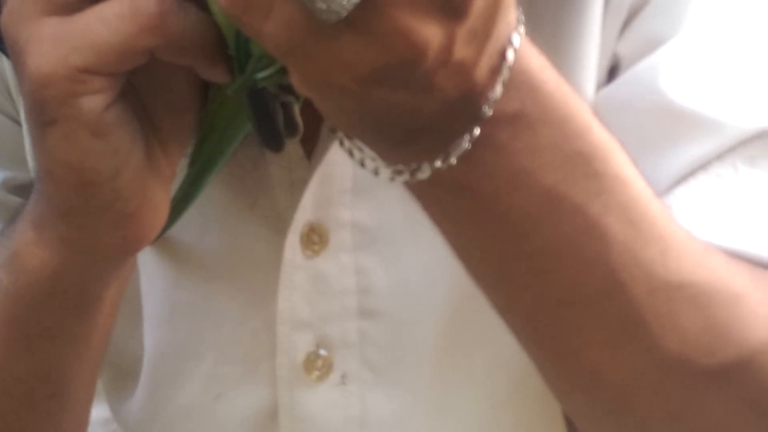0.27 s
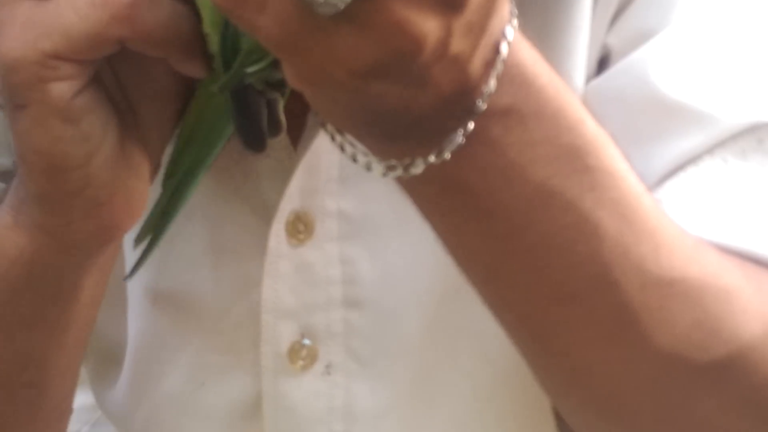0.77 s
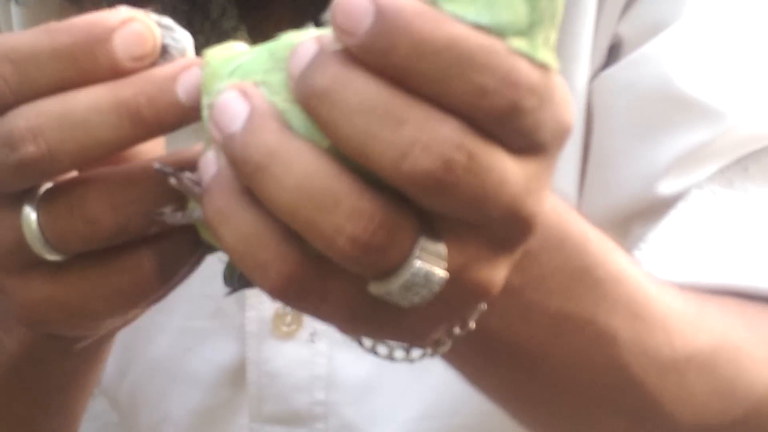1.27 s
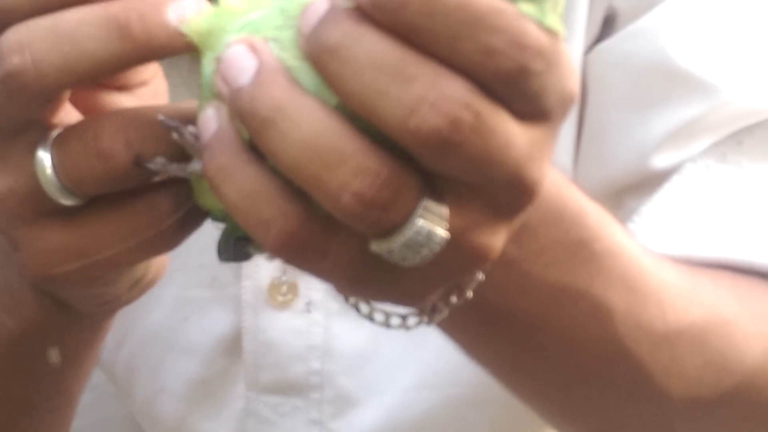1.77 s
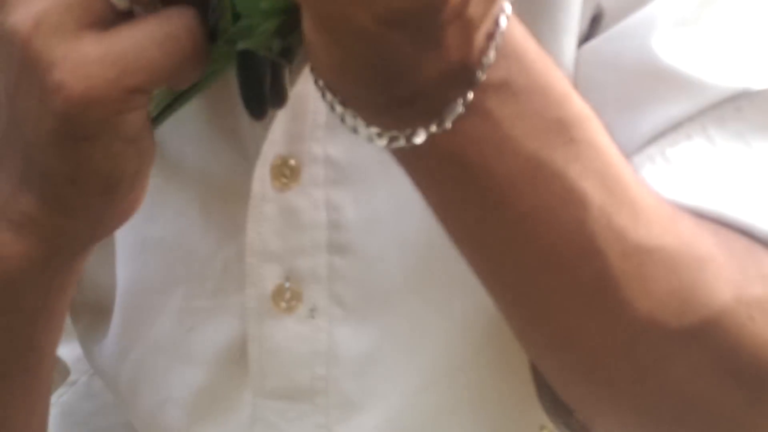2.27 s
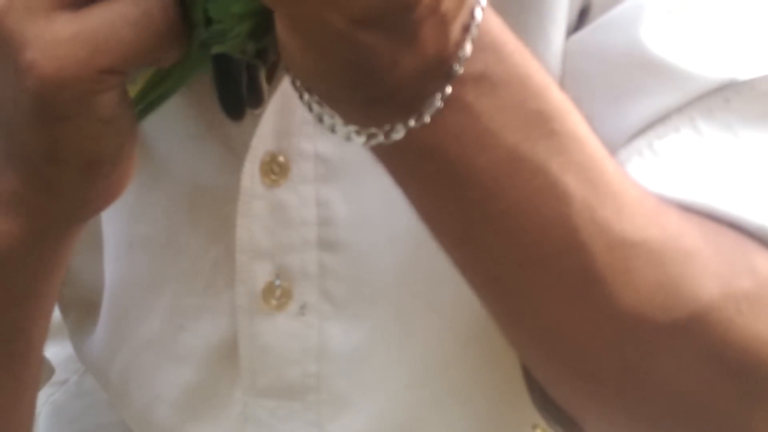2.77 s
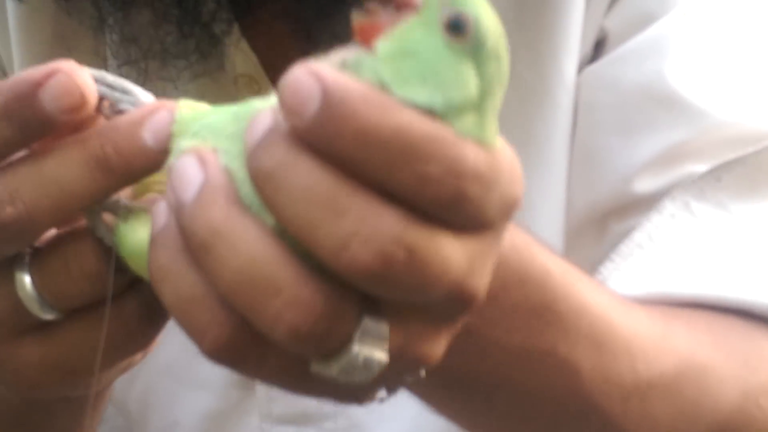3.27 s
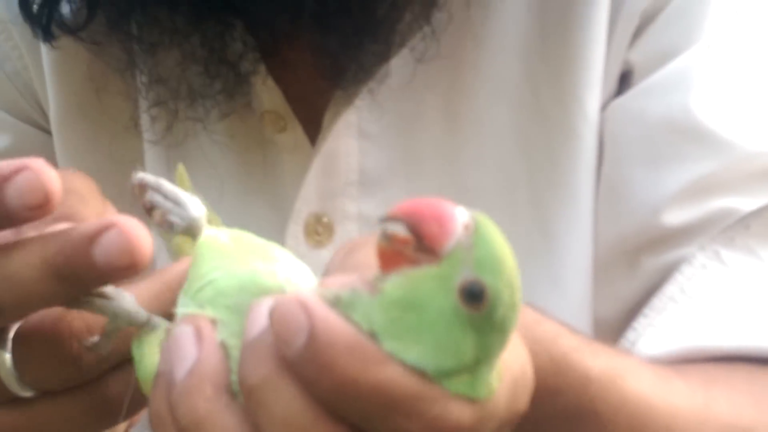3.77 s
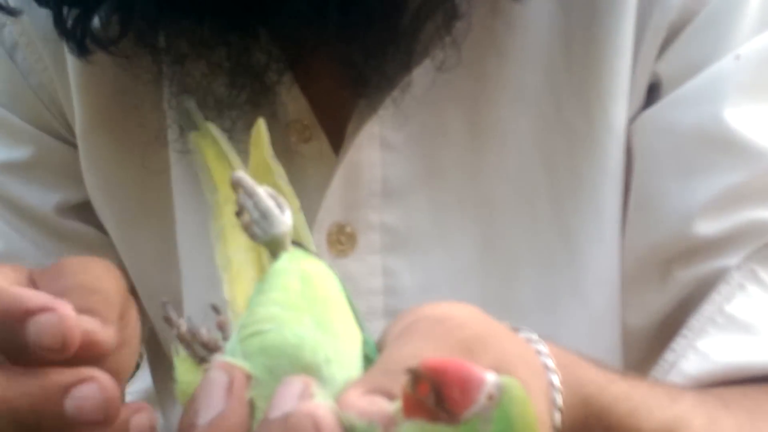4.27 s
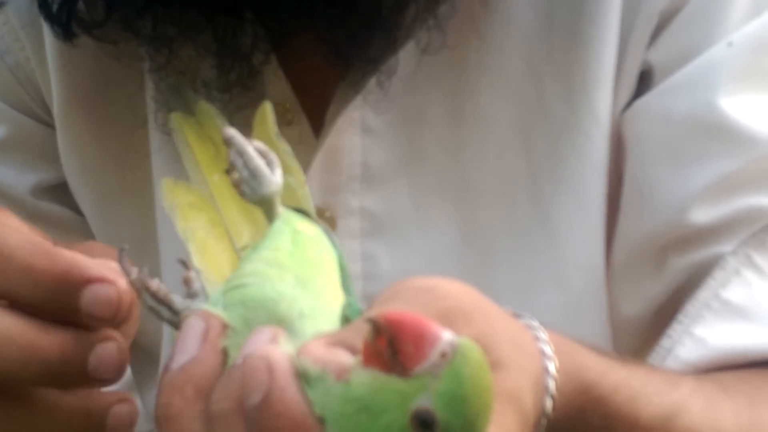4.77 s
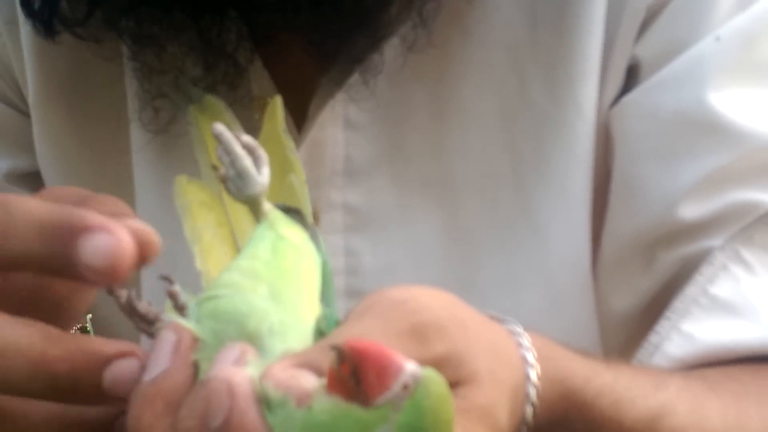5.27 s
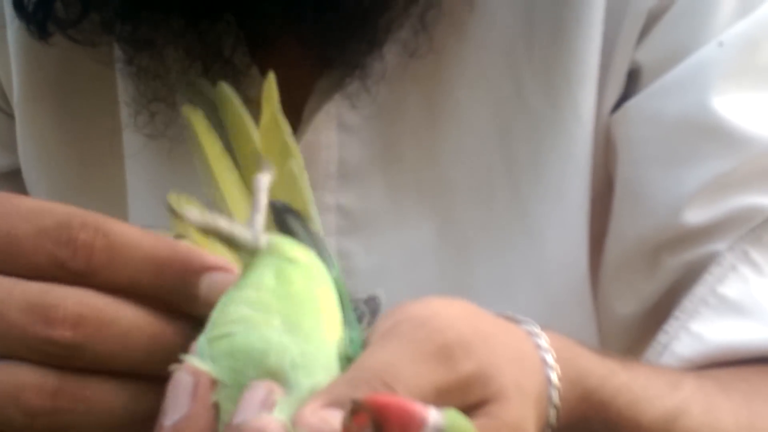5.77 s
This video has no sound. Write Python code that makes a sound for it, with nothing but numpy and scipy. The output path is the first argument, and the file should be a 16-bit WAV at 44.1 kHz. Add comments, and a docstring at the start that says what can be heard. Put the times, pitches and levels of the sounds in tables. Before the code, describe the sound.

Close, raspy parakeet screeches in a rapid run, then a lull of soft grunts and distant chirping over faint hiss, ended by one brief squawk.

```python
"""Parakeet screeching in the hands

A hand-held parakeet close to a two-port microphone screeches six times, the last after a long gap.
Its syrinx sings near 1 kHz, chopped into about a hundred bursts a second that ring the throat and beak.
Between screeches it squeaks, huffs, grunts and ticks softly, as gliding tones and short coloured noise.
Far off a small bird twitters in falling chirps, over noise shaped into high hiss, rumble and faint
chirring bands, and a low steady-pitched hum."""
import sys
import numpy as np
from scipy import signal
from scipy.fft import rfft, irfft
from scipy.io import wavfile
from scipy.ndimage import uniform_filter1d, map_coordinates

SR = 44100
rng = np.random.default_rng(int(sys.argv[2]) if len(sys.argv) > 2 else 0)


def wrap_up_sound(samples):
    """Save the sound to the file named by the first command line argument, as 16-bit audio."""
    columns = np.atleast_2d(samples).T
    # keep every value between -1 and 1, then stretch to whole-number steps
    tamed = np.clip(columns, -1, 1)
    steps = np.round(tamed * 32767).astype(np.int16)
    wavfile.write(sys.argv[1], SR, steps)


N = 265570
T = np.arange(N) / SR
FREQS = np.fft.rfftfreq(2048, 1 / SR)

# the close bird's screeches: start [t/s], attack [t/s], end [t/s], full level at middle pitch [level/dB],
# opening croak [level/dB], swell depth [level/dB, below 0 starts louder], swell time [t/s],
# treble at middle pitch [level/dB], first and last bursts per second at middle pitch [f/Hz],
# roughness at middle pitch [share]
SCREECH_ROWS = [ (.097, .043, 0.71, -26.9, -7, 5, 0.53, -1.7, 92, 102, .85),
                (.893, .019, 1.468, -23, -10, 5.5, .16, 1, 99, 107, .9),
                (1.602, .017, 2.112, -21.8, -8, -3, 0.045, 2, 89, 112.3, .6),
                (2.245, .022, 2.564, -22.2, -10, -.5, 0.017, -2, 96.1, 79.17, .62),
                (2.893, .043, 3.386, -22.1, -13, 2, .075, -1.5, 100.2, 104.9, .9),
                (5.836, .018, 6.06, -19.8, -17, -3.5, .07, 5, 112.5, 122.5, 1.2)]
# pitch the syrinx holds once taut, one curve per screech: [t/s], [f/Hz]
HELD_PITCH = [
    [(.15, 983), (.2, 894), (.33, 800), (.46, 830.5), (.57, 934), (.68, 995)],
    [(.92, 995), (1.02, 900), (1.14, 1060), (1.17, 1177), (1.42, 1129)],
    [(1.62, 1030), (1.7, 1122), (1.83, 1157), (1.91, 1252), (2.07, 1205)],
    [(2.27, 1026), (2.34, 1078), (2.46, 995), (2.53, 937)],
    [(2.93, 977), (3.09, 947), (3.18, 1076), (3.3, 1067), (3.355, 991)],
    [(5.86, 1089), (5.9, 1101), (6.02, 1028)],
]
# mouth shape, one row per screech: strength of each mouth resonance [level/dB]
MOUTH_SHAPES = [(1.1, 6.5, -7, 2.5, 3, -1.5, -1.5, -2, 0, 0.69, 2.5, 0.39),
                (8.1, 3, -2.5, 4, 5, -3, 1, 4, -2, 1.9, 2, 1),
                (11, 4.5, 4.5, 4, 2, -0.5, 2, 4.5, -5, 4, 0.5, 0.48),
                (.5, 4.5, -14, -1, -0.5, 0.5, -2, -2.5, 2, 7.7, -2.5, -1.4),
                (4.5, -1, -1, 4.5, 2, 2.5, 5, 1.5, -0.5, 4.5, -4, -1.3),
                (6.3, 7, 5.5, 0, -0.5, -4.5, 5.5, -0.5, -18, 11, 3, 0.65)]
# manner of singing, one row per screech: shut share of a beat when taut [0-1],
# dying time of a burst before roughness scales it [t/ms], odd harmonics at half roughness [level/dB],
# rasp at full roughness [level/dB], sinking of the rasp's strands [share per burst],
# unevenness of the beat [0-1]
SINGING_MANNER = [(.54, 1.1, -4, -3, -0.0064, .1), (.74, 1.2, -0.5, -5, 0, .025),
                  (.69, 1.11, -1.5, -5, -.005, .03), (.68, 1.22, 0, -3.5, 0.007, .025),
                  (0.7, 2, 0.5, 0, .013, .025), (.7, 2.8, 0, -13, -.004, 0.01)]
# extra lag at the right port, from where the head points, one per screech: [t/ms]
HEAD_LAG = [0.043, 0.0037, -0.0048, -0.018, 0.015, -0.027]
# each screech tightens from a slack, soft croak
SLACK_HZ, TIGHTEN_S, FADE_IN_S, ATTACK_TREBLE_DB = 460, .024, 0.0029, -4
# the swell gathers pace; before it, a screech is smoother and duller
SWELL_POWER, FIRST_ROUGH_SHARE, FIRST_TREBLE_DB = 2.1, 0.59, -3.5
# it lets go into a low, quiet, dull end
RELEASE_S, RELEASE_DB, RELEASE_TREBLE_DB, RELEASE_HZ = .03, -28, -11, 420
# a tighter syrinx is louder, brighter, faster and rougher: change per octave above the middle pitch
MIDDLE_HZ = 1000
LOUD_DB_PER_OCT, TREBLE_DB_PER_OCT, BEAT_OCT_PER_OCT, ROUGH_PER_OCT = 2, 18.5, .2, .3


def screeches(treble_from_hz=3000):
    """Each screech catches, swells, holds and lets go; pitch steers level, treble, beat and roughness."""
    out = np.zeros((2, N))
    rows = zip(SCREECH_ROWS, HELD_PITCH, MOUTH_SHAPES, SINGING_MANNER, HEAD_LAG)
    for row, pitch, mouth_db, manner, lag_ms in rows:
        (start, attack_s, end, db, croak_db, swell_db, swell_s,
         bright_db, first_rate, last_rate, rough) = row
        full = start + attack_s
        slack = 1 - ramp(start, min(attack_s, TIGHTEN_S)) ** 2
        weak = 1 - ramp(full, swell_s) ** SWELL_POWER
        release = ramp(end - RELEASE_S, RELEASE_S)

        held = curves(pitch, T)[0]
        octaves = np.log2(held / MIDDLE_HZ)
        hz = held * (SLACK_HZ / held) ** slack * (RELEASE_HZ / held) ** release

        rate = first_rate + (last_rate - first_rate) * ramp(start, end - start)
        rate = rate * 2 ** (BEAT_OCT_PER_OCT * octaves)
        roughness = rough * (1 - weak * (1 - FIRST_ROUGH_SHARE)) + ROUGH_PER_OCT * octaves
        roughness = roughness * (1 - release / 2)

        level_db = db + croak_db * (T < full) - swell_db * weak
        level_db = level_db + LOUD_DB_PER_OCT * octaves + RELEASE_DB * release
        treble_db = bright_db + TREBLE_DB_PER_OCT * octaves + FIRST_TREBLE_DB * weak
        treble_db = treble_db + ATTACK_TREBLE_DB * slack + RELEASE_TREBLE_DB * release

        times = beats(start, full, end, rate, manner[-1])
        voice = screech(times, hz, roughness, mouth_db, manner)
        low_pass = signal.butter(2, treble_from_hz, fs=SR, output="sos")
        low = signal.sosfiltfilt(low_pass, voice)
        pair = ports(low + (voice - low) * undb(treble_db), lag_ms)
        loudness = pair.mean(0)[(T > start) & (T < end)].std()
        out += pair * ramp(start, FADE_IN_S) * undb(level_db) / loudness
    return out


# moments when the syrinx stays open and whistles: start [t/s], length [t/s]
OPEN_WHISTLES = [(.183, .027), (.24, .016), (.266, .014), (.29, .052), (.423, .022), (.503, .014)]


def beats(start, full, end, rate, uneven, lead_s=.0105):
    """Times the syrinx springs open: croaks in the attack, then a near-even beat with gaps for whistles."""
    croaks = max(round((full - start) / lead_s), 1)
    times = list(np.linspace(start, full, croaks + 1))
    for late in rng.standard_normal(128):
        rate_now = rate[min(int(times[-1] * SR), N - 1)]
        times.append(times[-1] + max(1 + uneven * late, .5) / rate_now)

    def whistling(s):
        """A burst due now is left out, so the one before it sounds on."""
        return any(0 < s - at < length for at, length in OPEN_WHISTLES)

    return np.array([s for s in times if s < end and not whistling(s)] + [end])


# throat and beak: [f/Hz], gain [level/dB]
THROAT_GAIN = [(80, -63), (250, -46.5), (450, -27), (700, -19.5), (1000, -15.3), (1400, -11.3),
               (2000, -6.5), (3300, -6.5), (5000, -2.5), (6700, -24), (8300, -13.5), (11000, -21.5),
               (13500, -37.5), (15000, -33.5), (16500, -57.5)]
# mouth resonances: centre [f/Hz], half width to 1/e of the dB strength [f/Hz]
MOUTH_RESONANCES = [(700, 86), (1120, 52), (1400, 113), (1720, 130), (2100, 160), (2550, 290), (3250, 340),
                    (4300, 310), (5100, 250), (6500, 840), (8300, 410), (10500, 1200)]


def screech(times, hz, roughness, mouth_db, manner, size_db=1., settle_s=0.0136):
    """A run of bursts of near-steady strength, each nearly repeating the last, rings throat and mouth."""
    source = np.zeros(N)
    longest = SR // 10
    memory = .9
    flutter = None
    *_, sink, _ = manner
    for k, (sharp, strong) in enumerate(rng.standard_normal((128, 2))):
        fresh = np.array([walk(1300, size=longest), rng.standard_normal(longest)])
        if k + 1 >= len(times) or times[k] >= T[-1]:
            continue
        # the flutter within a burst changes slowly, so the buzz carries drifting strands
        if flutter is None:
            flutter = fresh
        else:
            flutter = memory * stretch(flutter, sink) + np.sqrt(1 - memory ** 2) * fresh
        start, period = times[k], times[k + 1] - times[k]
        t = T[:min(int((period + .006) * SR), longest)]
        now = np.minimum(int(start * SR) + np.arange(len(t)), N - 1)
        # a long burst settles into a cleaner tone
        rough = np.clip(roughness[now[0]] * min(settle_s / period, 1), .01, 1)
        wave = burst(t, hz[now], period, rough, manner, sharp, flutter[:, :len(t)])
        add(source, start, undb(size_db * strong) * wave)

    mouth = np.zeros(len(FREQS))
    for (centre, width), db in zip(MOUTH_RESONANCES, mouth_db):
        mouth += db * np.exp(-((FREQS - centre) / width) ** 2)
    return resonate(source, across(THROAT_GAIN) + mouth)


def burst(t, hz, period, rough, manner, chance, flutter, scatter=.035, sag=0.29, jitter=.11,
          attack_s=0.00025, droop_s=.2, skew=.12, slack_db=28, taut_hz=900, slowest_beat_s=0.0116):
    """The syrinx springs open, buzzes for a few cycles, then shuts and sinks in pitch as it dies."""
    shut_share, dying_ms, odd_db, rasp_db, *_ = manner
    # a slack syrinx shuts for less of the beat
    shut_s = shut_share * min(period, slowest_beat_s) * min(hz[0] / taut_hz, 1)
    open_s = max(period - shut_s, period / 10)
    # rough bursts linger and run into each other
    dying_s = dying_ms / 1000 * (0.46 + rough)
    dying = np.exp(-np.maximum(t - open_s, 0) / dying_s)
    size = (1 - np.exp(-t / attack_s)) * dying * np.exp(-t / droop_s)

    wobble = 1 + rough * scatter * chance + np.sqrt(rough) * jitter * flutter[0]
    pitch = hz * wobble * (1 - sag * (1 - dying))
    phase = 2 * np.pi * np.cumsum(pitch) / SR - np.pi / 2
    k = np.arange(1, 21)[:, None]  # harmonic numbers
    # strong and weak pulses alternate, which thins the odd harmonics, most of all in clean stretches
    weight_db = odd_db * (k % 2) * (k > 1) * 2 * (1 - rough)
    # a slack syrinx swings low and round, with a strong fundamental
    weight_db = weight_db + slack_db * (k == 1) * np.maximum(1 - hz / taut_hz, 0)
    weight = undb(weight_db) * (k * pitch < SR * .45)
    buzz = unit((weight * np.cos(k * phase + skew * k ** 2)).sum(0))
    rasp = undb(rasp_db) * np.sqrt(rough) * flutter[1]
    wave = size * (buzz + rasp)
    return wave / np.sqrt(np.sum(wave ** 2) / (period * SR))


# the close bird at the two microphone ports: [f/Hz], left's lead [radians]
LEFT_LEAD = [(100, 0), (600, .3), (850, .75), (1120, -.2), (1400, 1.8), (1900, 1.7), (2400, 3.1),
             (3000, 4.9), (3600, 6.8), (4300, 8.7), (5000, 9.5), (7000, 10.2), (8400, 12.5), (9500, 15.4),
             (11000, 18.6), (16000, 31)]
# the same: [f/Hz], left minus right [level/dB]
LEFT_EXCESS = [(100, 0.5), (720, 1), (950, 4.5), (1280, 8), (1500, 0.5), (2400, 2), (3250, 17.5),
               (4150, 5.5), (5600, 14), (8000, 3), (11000, 5.5), (16000, 3)]


def ports(x, lag_ms, turn_s=.000012):
    """The close bird reaches the right port later and partly shaded; the lag wanders as its head turns."""
    shade = irfft(undb(-across(LEFT_EXCESS)) * np.exp(-1j * across(LEFT_LEAD)))
    half = len(shade) // 2
    right = signal.fftconvolve(x, np.roll(shade, half))[half:half + N]
    heard_at = T - lag_ms / 1000 + turn_s * walk(8)
    return np.array([x, map_coordinates(right, [heard_at * SR], order=3)])


# soft squeaks and grunts, close: start [t/s], length [t/s], first pitch [f/Hz], last pitch [f/Hz],
# rms at the loudest [level/dB], waver [share of pitch]
SQUEAK_ROWS = [(1.542, .035, 1000, 1080, -47, .02), (1.696, .11, 294, 245, -60.5, .02),
               (1.94, 0.075, 310, 239, -53, 0.0097), (2.115, 0.1, 2050, 2360, -49.5, .06),
               (2.214, 0.02, 1050, 1266, -48.5, .02), (3.848, .07, 288, 235, -48, .01)]


def squeaks():
    """Soft squeaks and low grunts, each one gliding tone."""
    out = np.zeros(N)
    for start, length, from_hz, to_hz, db, waver in SQUEAK_ROWS:
        add(out, start, undb(db) * glide(length, from_hz, to_hz, waver))
    return out


# colour of the huffed breath: [f/Hz], gain [level/dB]
BREATH_COLOUR = [(150, -32), (250, 2), (333, -8), (499, -3), (1050, -13), (1160, -1), (1420, -12.5),
                 (2830, -10.5), (4380, -15.5), (6130, -13), (6670, -22.5), (7630, -11), (14000, -29)]


def huff(start_s=3.788, level_db=-45, attack_s=.005, fade_db_per_s=96):
    """One huff: coloured noise with a quick onset and an even fade in decibels."""
    fade = undb(level_db - fade_db_per_s * np.maximum(T - start_s, 0))
    breath = unit(resonate(rng.standard_normal(N), across(BREATH_COLOUR)))
    return breath * ramp(start_s, attack_s) * fade


# ticks of beak and claws: start [t/s], rms before the decay [level/dB], centre [f/Hz]
TICK_ROWS = [(1.553, -43, 9800), (3.574, -46.5, 3900)]


def ticks(decay_s=0.0028, half_width_hz=400):
    """Small ticks of beak and claws: narrow noise that dies in a few milliseconds."""
    out = np.zeros(N)
    t = T[:SR // 20]
    for start, db, hz in TICK_ROWS:
        peak_db = -10 * np.log10(1 + ((FREQS - hz) / half_width_hz) ** 2)
        ring = resonate(rng.standard_normal(len(t)), peak_db)
        add(out, start, undb(db) * unit(ring) * np.exp(-t / decay_s))
    return out


# far bird: first chirp [t/s], top pitch [f/Hz], typical rms at a chirp's loudest, before 3 dB is taken
# off its direct sound [level/dB]
TWITTER_ROWS = [(-.003, 5940, -49), (.835, 5900, -56.5), (2.54, 6000, -56), (2.808, 5900, -55),
                (3.703, 5980, -56), (3.938, 5900, -54.5), (4.146, 6400, -58), (4.62, 5960, -52),
                (4.855, 5900, -54.5), (5.266, 6380, -61), (5.461, 5970, -52.5)]


def twitters(spacing_s=.0275, length_s=0.0168, fall=.83, vary_db=2, count=3):
    """A small far bird: quick triplets of falling chirps of uneven strength."""
    out = np.zeros(N)
    for start, hz, db in TWITTER_ROWS:
        for k, strong in enumerate(rng.standard_normal(count)):
            chirp = glide(length_s, hz, hz * fall, 0.0049)
            add(out, start + k * spacing_s, undb(db + vary_db * strong) * chirp)
    return out


def glide(length, from_hz, to_hz, waver):
    """A soft whistle that swells, slides and fades."""
    u = np.linspace(0, 1, int(length * SR))
    hz = (from_hz + (to_hz - from_hz) * u) * (1 + waver * walk(500, size=len(u)))
    return np.sqrt(2) * np.sin(np.pi * u) * np.sin(2 * np.pi * np.cumsum(hz) / SR)


def tail(x, t60, db, dull_hz=6000):
    """Dense, dulled reflections, different at each port, falling 60 dB in t60 seconds."""
    t = T[:int(t60 * SR)]
    echo = rng.standard_normal((2, len(t))) * undb(-60 * t / t60) * (t > .002)
    low_pass = signal.butter(1, min(dull_hz, SR / 3), fs=SR, output="sos")
    echo = signal.sosfilt(low_pass, echo)
    echo *= undb(db) / np.sqrt(np.sum(echo ** 2) / 2)
    return signal.fftconvolve(x[None], echo, axes=1)[:, :N]


# faint far bands that swell and fade: centre [f/Hz], half width to 1/e [f/Hz], typical level [level/dB]
CHIRR_BANDS = [(1784, 133, -79), (4410, 260, -76), (5900, 420, -71.5)]


def far_chirr(swell_db=3.5, flicker_db=2):
    """Narrow, faint bands of distant chirring noise that come and go."""
    hz = np.fft.rfftfreq(N, 1 / SR)
    out = np.zeros((2, N))
    for centre, width, db in CHIRR_BANDS:
        shape = np.exp(-((hz - centre) / width) ** 2)
        band = irfft(rfft(rng.standard_normal((2, N))) * shape, N)
        out += unit(band) * undb(db + swell_db * walk(3.72) + flicker_db * walk(25))
    return out


# colour of the low rumble: [f/Hz], relative density [level/dB]
RUMBLE_COLOUR = [(25, -19), (45, -10), (62, 0.09), (80, -6), (130, -6), (220, -11), (400, -19), (700, -22),
                 (1400, -27), (1800, -21), (2600, -30), (3500, -35), (6000, -60)]
# colour of the high hiss: [f/Hz], relative density [level/dB]
HISS_COLOUR = [(3000, -16), (3900, -18.5), (4500, -11.5), (5000, -12.5), (6100, -6.5), (6600, -17.5),
               (7200, -4), (7800, 3), (8400, -10), (9400, -11.5), (10500, -23.5), (16000, -22)]
# likeness of the background at left and right ports: [f/Hz], correlation [0-1]
PORT_LIKENESS = [(30, .96), (100, .92), (250, .8), (1000, .4), (3000, 0), (16000, 0)]


def rumble_and_hiss(rumble_db=-59, hiss_db=-60, flicker_db=0.5):
    """Flickering noise: rumble much alike at both ports and hiss unlike; levels are of the shared part."""
    hz = np.fft.rfftfreq(N, 1 / SR)
    like = np.clip(across(PORT_LIKENESS, hz), 0, 1)
    out = np.zeros((2, N))
    for colour, db in ((RUMBLE_COLOUR, rumble_db), (HISS_COLOUR, hiss_db)):
        gain = undb(across(colour, hz))
        mid = irfft(rfft(rng.standard_normal(N)) * gain * np.sqrt(1 + like), N)
        side = irfft(rfft(rng.standard_normal(N)) * gain * np.sqrt(1 - like), N)
        pair = np.array([mid + side, mid - side]) / mid.std()
        out += pair * undb(db + flicker_db * walk(9))
    return out


def hum(hz=60.4, level_db=-72, drift_db=2):
    """A low tone, the same at both ports, whose level drifts."""
    return undb(level_db + drift_db * walk(4.2)) * np.sqrt(2) * np.sin(2 * np.pi * hz * T)


def undb(db):
    """Decibels to gain."""
    return 10 ** (np.asarray(db) / 20)


def unit(x):
    """Scale to rms 1."""
    return x / np.sqrt(np.mean(x ** 2) + 1e-18)


def ramp(start, length):
    """Rises from 0 to 1 over the given time."""
    return np.clip((T - start) / length, 0, 1)


def curves(rows, t):
    """The columns of a time table, joined by straight lines."""
    s, *columns = np.transpose(rows)
    return [np.interp(t, s, c) for c in columns]


def across(points, hz=FREQS):
    """(f/Hz, value) points joined on a log-frequency axis."""
    f, value = np.transpose(points)
    return np.interp(np.log(hz + 1), np.log(f), value)


def resonate(x, db):
    """Causal minimum-phase filter with the given gain at FREQS."""
    cepstrum = irfft(np.log(undb(db)))
    half = len(cepstrum) // 2
    # folding the cepstrum forward in time makes the filter causal
    cepstrum[1:half] *= 2
    cepstrum[half + 1:] = 0
    impulse = irfft(np.exp(rfft(cepstrum)))
    return signal.fftconvolve(x, impulse)[:len(x)]


def walk(rate, size=N):
    """Smooth chance with a spread near 1, renewed at the given rate in Hz."""
    k = max(int(SR / rate), 1)
    steps = np.repeat(rng.standard_normal(size // k + 1), k)
    return unit(uniform_filter1d(steps, k))[:size]


def stretch(rows, share):
    """Each row played slower by the given share."""
    at = np.arange(rows.shape[1]) * (1 - share)
    return np.array([map_coordinates(row, [at], order=3, mode="mirror") for row in rows])


def add(track, start, sound):
    """Mix a sound into a track from a start time on."""
    i = max(int(start * SR), 0)
    part = sound[:max(len(track) - i, 0)]
    track[i:i + len(part)] += part


def scene():
    """The close bird, quick reflections off hands and chest, a faint room, and the surroundings."""
    bird = screeches() + huff() + squeaks() + ticks()
    body = tail(bird[0], t60=.035, db=-16)
    room = tail(bird[0], t60=0.46, db=-34)
    far = twitters()
    far_bird = far * undb(-3) + tail(far, t60=.15, db=-8)
    return bird + body + room + far_bird + far_chirr() + rumble_and_hiss() + hum()


def record(dry, top_hz=16200):
    """The recorder rounds the highest peaks and cuts the top."""
    low_pass = signal.ellip(8, .1, 60, top_hz, fs=SR, output="sos")
    return signal.sosfiltfilt(low_pass, np.tanh(dry))


dry = scene()
out = record(dry)
wrap_up_sound(out)
```